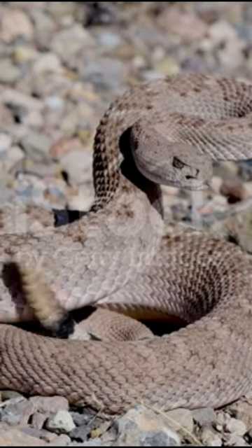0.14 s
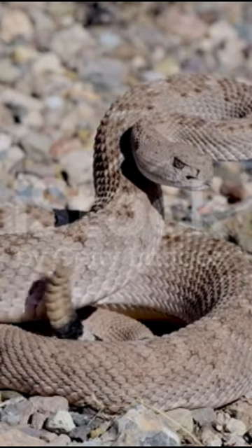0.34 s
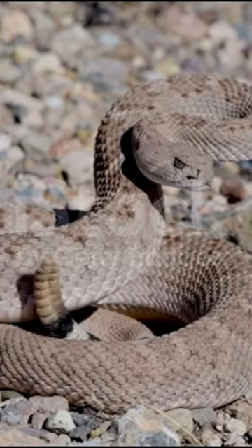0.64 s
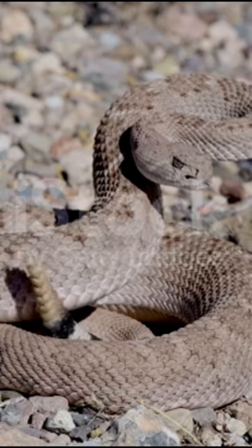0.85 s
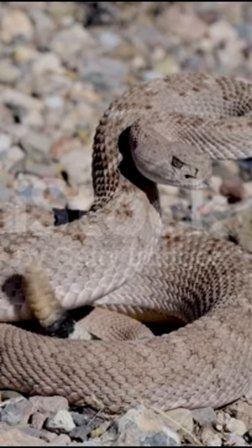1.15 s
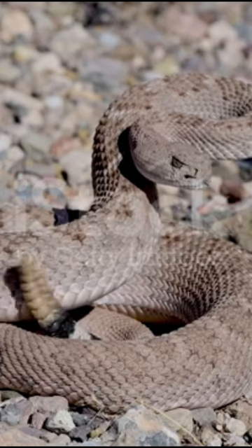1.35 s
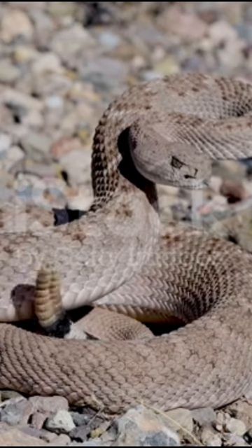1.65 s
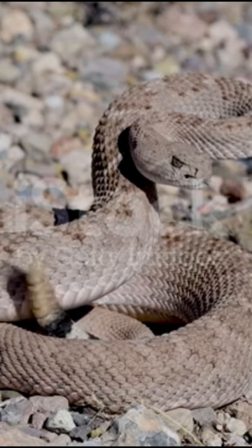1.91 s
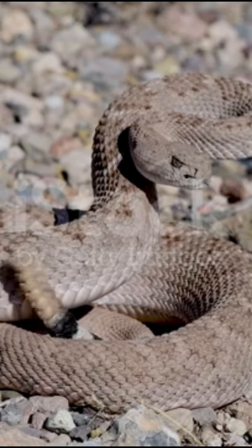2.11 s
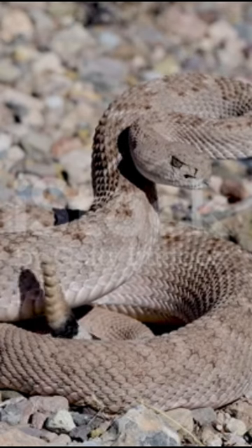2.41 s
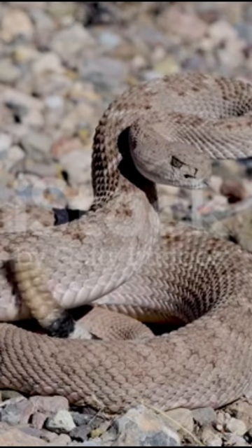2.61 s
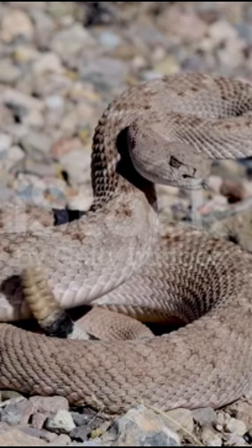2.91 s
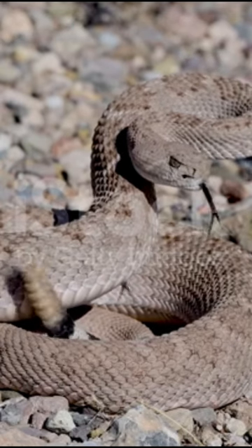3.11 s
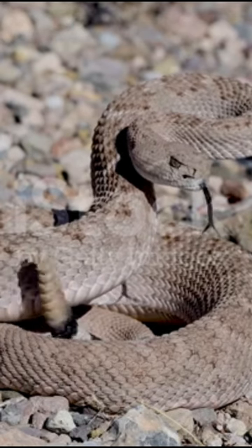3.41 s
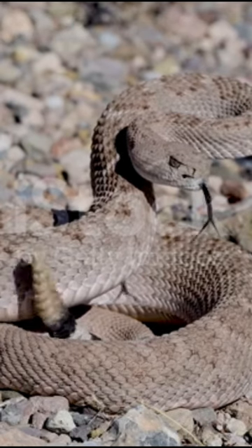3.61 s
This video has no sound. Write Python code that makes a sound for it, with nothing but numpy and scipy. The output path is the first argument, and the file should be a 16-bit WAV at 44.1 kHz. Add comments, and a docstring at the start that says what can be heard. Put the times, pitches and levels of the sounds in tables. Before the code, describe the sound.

A rattlesnake's tail rattles continuously from 0 to about 3.75 seconds, close and dry. Hollow horny segments clatter in dense tiny clicks with harder snaps, making a thin, bright, hissy buzz without low body. It flutters around 22 times a second, unevenly in the first second, easing below 20 by the end with deeper pulses. Brief ringing sits centrally, crackle spreads wide; background is practically silent.

```python
"""A dry rattle pulses about twenty times a second, slowing a little: a rattlesnake shakes its tail close by.
Each swing throws the loose horny segments together in a burst of tiny contacts with a few harder snaps.
The hollow segments ring briefly in the centre; the bright crackle of the contacts spreads wide.
Far below lie a faint low rustle, two faint narrow noise bands and a trace of hum."""
import sys
import numpy as np
from scipy import signal
from scipy.fft import rfft, irfft
from scipy.io import wavfile

SR = 44100
rng = np.random.default_rng(int(sys.argv[2]) if len(sys.argv) > 2 else 0)


def wav_out(sig):
    """Save sig, one row per channel (or a flat mono array), as 16-bit PCM at SR to the path in sys.argv[1]."""
    wavfile.write(sys.argv[1], SR, np.round(np.clip(np.atleast_2d(sig).T, -1, 1) * 32767).astype(np.int16))


N = 165375
TIME_S = np.arange(N) / SR

START_PHASE_CYCLES, TIMING_SPREAD_CYCLES, TIMING_DRIFTS_PER_S = 0.36, 0.013, 20
MEAN_SWING_DEPTH_DB, DEPTH_GROWTH_DB_PER_S = 9, 0.7
SWING_SPREAD_DB, SWING_SHARPNESS = 0.36, 0.89
CLUMP_DB, CLUMPS_PER_S = 1.03, 200
SNAPS_PER_S, SNAP_DB, SNAP_DECAY_S = 85, -1.5, 0.0013
CONTACTS_PER_S, CONTACT_HALF_RANGE_DB = 9000, 3.5
MODE_CLUMP_DB, MODE_CLUMPS_PER_S = 2.1, 140
MODE_WANDER_DB, MODE_WANDERS_PER_S = 1.28, 30
LOW_BAND_WAVER_DB, LOW_BAND_WAVERS_PER_S = 7, 12
# layer levels relative to the rms of the force on the segments
SHELL_DB, CRACKLE_DB, RUSTLE_DB = -5, -4.5, -60.5
RUSTLE_LEFT_DB = -6  # left side against right
HUM_HZ, HUM_POLE_WIDTH_HZ, HUM_DB = 41.5, 12, -102
LOW_CUT_HZ, HIGH_CUT_HZ = 2600, 12400


def from_db(db):
    """Decibels to gain."""
    return 10 ** (np.asarray(db) / 20)


def rms_one(x):
    """Scale to an rms of one."""
    return x / np.sqrt(np.mean(x ** 2) + 1e-20)


def in_time(rows):
    """Interpolate (s, value) rows to a control curve at every sample."""
    return np.interp(TIME_S, *np.transpose(rows))


def colour(x, points, share=1):
    """Filter by a (Hz, dB) curve, linear in log frequency, or by a share of its dB."""
    curve_hz, curve_db = np.transpose(points)
    bins_hz = np.maximum(np.arange(N + 1) * SR / (2 * N), 1)
    bins_db = np.interp(np.log(bins_hz), np.log(curve_hz), curve_db)
    # padded to 2 N to limit wrap-round
    return irfft(rfft(x, 2 * N) * from_db(share * bins_db))[..., :N]


def drift(per_s):
    """Bounded chance with an rms of one: straight lines between per_s random values a second."""
    return rms_one(np.interp(TIME_S * per_s, np.arange(N), rng.uniform(-1, 1, N)))


def resonate(x, hz, width_hz):
    """One two-pole resonance with a gain of about one on top."""
    radius = np.exp(-np.pi * width_hz / SR)
    zeros = np.array([1, 0, -1]) * (1 - radius * radius) / 2
    poles = [1, -2 * radius * np.cos(2 * np.pi * hz / SR), radius * radius]
    return signal.lfilter(zeros, poles, x)


def narrow(x, hz, width_hz):
    """Two equal resonances in series for steep sides; rms of one."""
    once = resonate(x, hz, width_hz)
    return rms_one(resonate(once, hz, width_hz))


def tail_swing():
    """Force on the segments: swells and falls once a swing, deeper with time, scaled by the vigour."""
    # speed of the tail: start_s, swings_per_s
    swing_rate = [(0.0, 21.22), (0.12, 23.5), (0.25, 21.73), (0.38, 23.02), (0.44, 28.32), (0.5, 18.11),
                  (0.56, 24.52), (0.62, 23.59), (0.69, 21.41), (0.75, 22.1), (0.82, 22.57), (0.88, 18.78),
                  (1.0, 23.33), (1.12, 21.27), (1.62, 21.19), (2.1, 20.25), (2.25, 20.08), (2.38, 20.25),
                  (2.5, 20.01), (2.62, 19.8), (2.75, 20.08), (2.87, 19.58), (3.0, 19.17), (3.12, 20.87),
                  (3.25, 16.73), (3.38, 19.83), (3.75, 18.62)]
    # vigour of the shaking: start_s, level_db
    vigour = [(0.0, -18), (0.1, -20.5), (0.15, -14.5), (0.2, -18.5), (0.3, -17), (0.5, -22), (0.55, -17),
              (0.65, -20.5), (0.8, -19), (0.85, -21.5), (1.35, -19.5), (1.4, -14), (1.45, -19),
              (1.55, -14.5), (1.6, -21), (1.65, -21.5), (1.7, -17.5), (1.8, -21.5), (1.9, -19.5),
              (2.0, -18), (2.05, -22), (2.2, -19.5), (2.35, -20), (2.4, -18), (2.7, -20), (2.75, -22),
              (2.8, -18), (3.1, -21.5), (3.15, -17.5), (3.45, -21.5), (3.7, -20.5), (3.75, -22)]
    phase_cycles = START_PHASE_CYCLES + np.cumsum(in_time(swing_rate)) / SR
    swing_index = np.round(phase_cycles).astype(int)
    uneven_cycles = phase_cycles + TIMING_SPREAD_CYCLES * drift(TIMING_DRIFTS_PER_S)
    thrust = np.abs(np.cos(np.pi * uneven_cycles)) ** (2 * SWING_SHARPNESS)
    depth_db = MEAN_SWING_DEPTH_DB + DEPTH_GROWTH_DB_PER_S * (TIME_S - TIME_S.mean())
    chance_db = SWING_SPREAD_DB * rng.standard_normal(size=200)[swing_index]  # one draw a swing
    return from_db(in_time(vigour) + depth_db * (thrust - 0.5) + chance_db * thrust)


def collisions():
    """Strength of the collisions within a swing: uneven clumps plus hard snaps that die away fast."""
    snap_starts = rng.random(N) < SNAPS_PER_S / SR
    last_snap_s = np.maximum.accumulate(TIME_S * snap_starts)
    snaps = from_db(SNAP_DB) * np.exp(-(TIME_S - last_snap_s) / SNAP_DECAY_S)
    clumps = from_db(CLUMP_DB * drift(CLUMPS_PER_S))
    return rms_one(clumps * (1 + snaps))


def contacts():
    """Tiny one-sample clicks of segment on segment, of random time, size and sign."""
    sizes = from_db(CONTACT_HALF_RANGE_DB * rng.uniform(-1, 1, N))
    signed_sizes = sizes * rng.choice([-1, 1], N)
    return rms_one(signed_sizes * (rng.random(N) < CONTACTS_PER_S / SR))


def shell(force):
    """Contacts ring every mode of the hollow segments, each mode in short bursts of its own."""
    # modes of the segments: pitch_hz, width_hz, drive_db
    shell_modes = [(2857, 274, -1), (3270, 110, -9.5), (3562, 206, -1.5), (3936, 200, 0), (4124, 213, -1),
                   (5420, 1100, -8), (7134, 650, -2), (8410, 1000, -8), (10500, 1180, -3.5),
                   (12010, 1130, 0.5)]
    rings = 0
    for pitch_hz, width_hz, drive_db in shell_modes:
        burst_db = MODE_CLUMP_DB * drift(MODE_CLUMPS_PER_S)
        wander_db = MODE_WANDER_DB * drift(MODE_WANDERS_PER_S)
        drive = from_db(drive_db + burst_db + wander_db) * force * contacts()
        rings = rings + resonate(drive, pitch_hz, width_hz)
    return from_db(SHELL_DB) * rms_one(rings)


def crackle(force):
    """Broad, dry crackle: separate contacts on each side make it wide."""
    # spectrum of the crackle: frequency_hz, relative_db_per_hz
    crackle_spectrum = [(2600, -7.5), (3200, -6), (3450, -3.5), (4050, -3), (4500, -1), (6500, 2),
                        (7400, -1.5), (8000, -5.5), (9500, -0.5), (11300, -2.5), (12300, -5)]
    # lean of the crackle: frequency_hz, left_minus_right_db
    side_lean = [(4200, 0), (4900, -3), (6100, 0.5), (6400, -2), (7600, 1.5), (9400, -1), (9900, 4),
                 (12000, 0.5)]
    sides = []
    for lean_share in (0.5, -0.5):  # left, right
        clicks = colour(force * contacts(), crackle_spectrum)
        sides.append(colour(clicks, side_lean, lean_share))
    return from_db(CRACKLE_DB) * rms_one(np.array(sides))


def rustle(force):
    """Very faint low noise that follows the swings, independent on each side and leaning right."""
    # spectrum of the rustle: frequency_hz, relative_db_per_hz
    rustle_spectrum = [(40, 6), (70, -25), (130, -12.5), (220, -2), (500, -3.5), (1700, 0), (2000, 1),
                       (4000, -32)]
    noise = rms_one(colour(force * rng.standard_normal((2, N)), rustle_spectrum))
    side_gains = np.array([[from_db(RUSTLE_LEFT_DB)], [1]])
    return from_db(RUSTLE_DB) * noise * side_gains


def low_bands(force):
    """Two very faint, narrow, wavering noise bands below the rattle, in the centre: filtered clicks."""
    # noise bands: centre_hz, pole_width_hz, level_db (relative to the force rms)
    band_rows = [(2002, 43, -60), (2281, 52, -52.5)]
    bands = 0
    for centre_hz, pole_width_hz, level_db in band_rows:
        waver = from_db(LOW_BAND_WAVER_DB * drift(LOW_BAND_WAVERS_PER_S))
        clicks = force * contacts() * waver
        bands = bands + from_db(level_db) * narrow(clicks, centre_hz, pole_width_hz)
    return bands


def hum():
    """A trace of low hum: narrow-band noise, independent on each side."""
    return from_db(HUM_DB) * narrow(rng.standard_normal((2, N)), HUM_HZ, HUM_POLE_WIDTH_HZ)


def scene():
    """The rattle, cut steeply below its lowest mode, over the rustle, low bands and hum."""
    force = tail_swing() * collisions()
    low_cut = signal.cheby1(14, 0.3, LOW_CUT_HZ, "high", fs=SR, output="sos")
    rattle = signal.sosfilt(low_cut, shell(force) + crackle(force))
    force_layers = rattle + rustle(force) + low_bands(force)
    force_rms = np.sqrt(np.mean(force ** 2))
    return force_rms * force_layers + hum()


def record(dry):
    """Cut the top steeply with an elliptic low-pass."""
    high_cut = signal.ellip(12, 0.1, 90, HIGH_CUT_HZ, fs=SR, output="sos")
    return signal.sosfilt(high_cut, dry)


dry = scene()
out = record(dry)
wav_out(out)
```